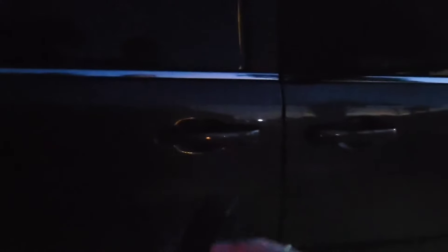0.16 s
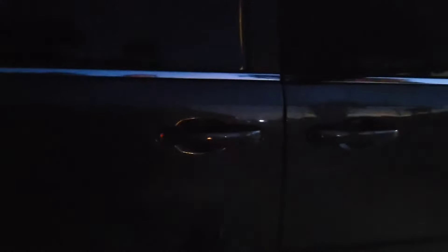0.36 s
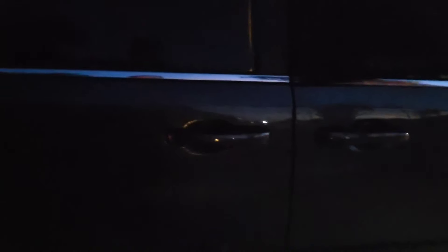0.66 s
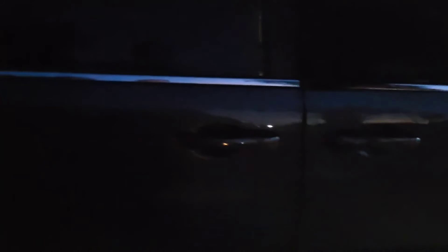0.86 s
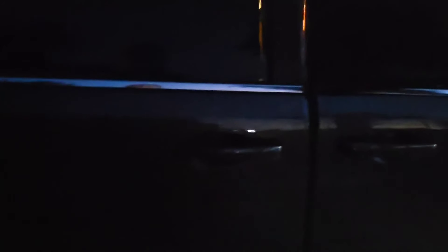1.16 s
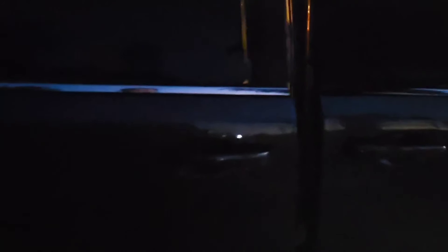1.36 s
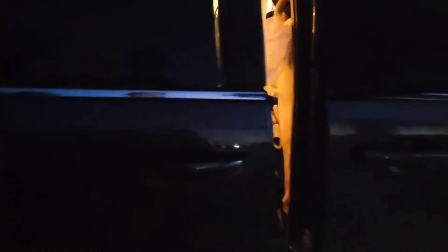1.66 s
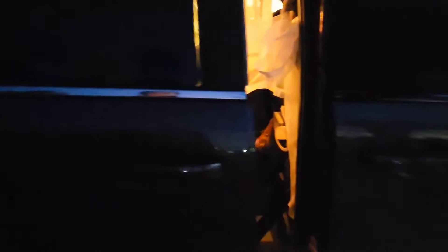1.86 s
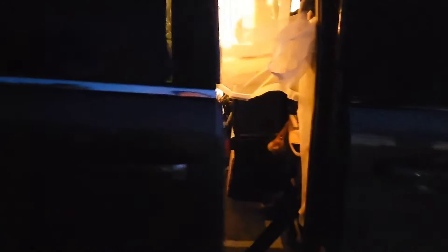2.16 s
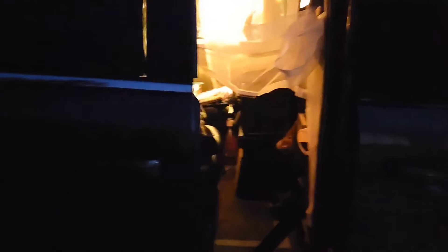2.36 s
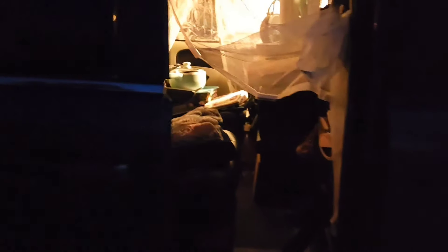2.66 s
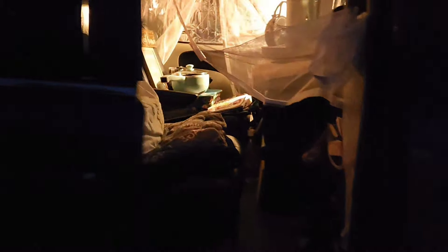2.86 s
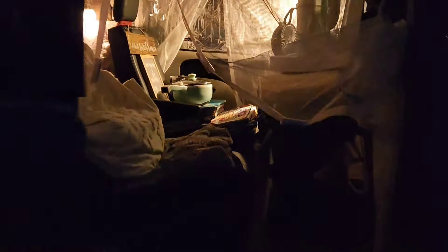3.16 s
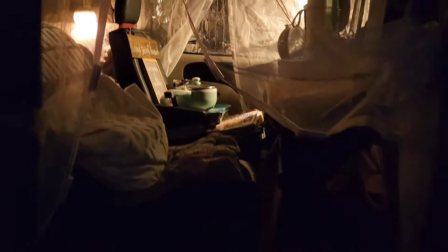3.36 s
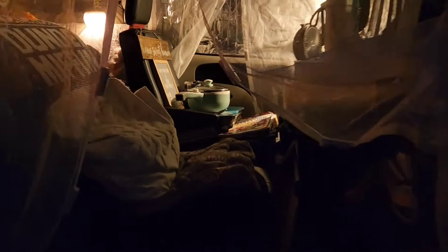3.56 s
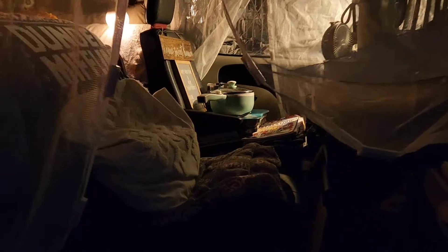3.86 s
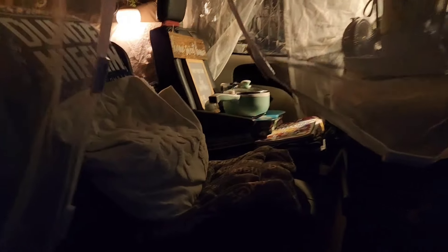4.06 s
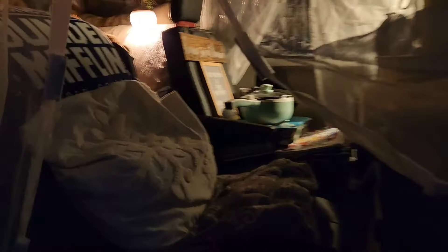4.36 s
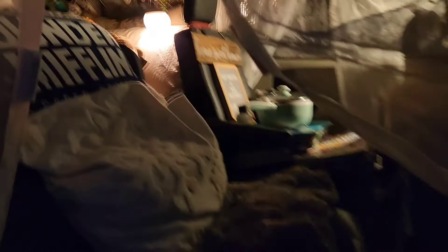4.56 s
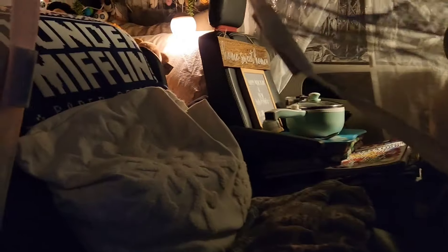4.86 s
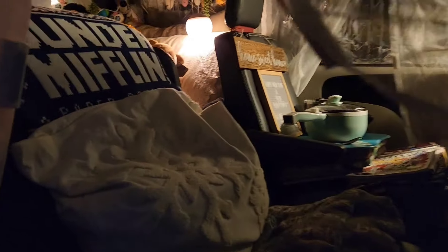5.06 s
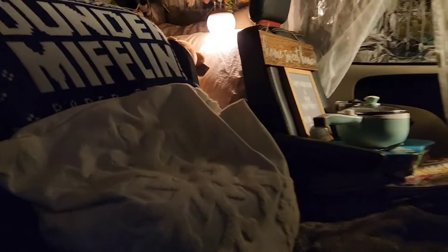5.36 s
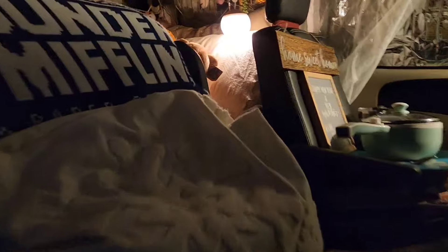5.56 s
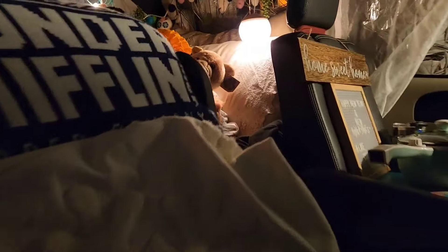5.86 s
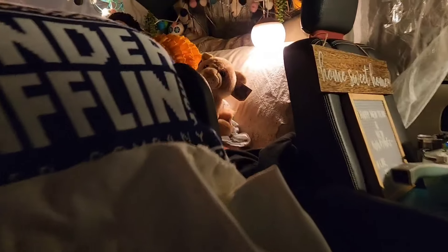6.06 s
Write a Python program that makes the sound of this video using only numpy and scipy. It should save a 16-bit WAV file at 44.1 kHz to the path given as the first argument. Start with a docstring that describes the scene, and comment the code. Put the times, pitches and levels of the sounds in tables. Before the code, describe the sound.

A low, dull street rumble opens the scene. Very near the microphone, a door latch clunks with metal clicks; after a short pause the heavy sliding door sets off, knocking and rattling, and travels for about four seconds with hollow boom, rail grind and airy roller hiss. A sharp double knock ends the travel with soft shudders. Inside the padded cabin, plastic snaps crisply at left and keys tinkle faintly at right.

```python
"""A low night street is heard first; then a van's door handle clicks and the latch lets go with a thud.
The powered sliding door rolls back along its rails, booming, grinding and hissing, and shudders on its stop.
A plastic snap follows on the left and keys on the right, while the street shifts in level and brightness.
Blows, plastic and keys are decaying modes; ticks are shaped noise bursts; door and street are drifting
noise bands; the drive is a wavering sine."""
import sys
import numpy as np
from scipy import signal
from scipy.fft import rfft, irfft
from scipy.io import wavfile

SR = 44100
rng = np.random.default_rng(int(sys.argv[2]) if len(sys.argv) > 2 else 0)


def to_wav(s):
    """Save 16-bit WAV."""
    ch = np.atleast_2d(s).T  # columns
    pcm = np.round(np.clip(ch, -1, 1) * 32767)  # PCM
    wavfile.write(sys.argv[1], SR, pcm.astype(np.int16))


N = 273443

# street at night: start_s, level_db, tilt_db [per octave]; then its spectrum: pitch_hz, density_db [per Hz, relative]
STREET_CURVE = [(0, -35.5, 2), (.6, -40, 3), (4, -41.5, 1), (5.5, -47.5, -4), (5.7, -48, 3),
                (5.95, -43, 1.7), (6.2, -51.5, 4.5)]
STREET_SPECTRUM = [(15, -36.5), (25, -8), (92, 1), (151, -21), (167, -21.5), (385, -28), (469, -36),
                   (712, -35), (1190, -41), (2210, -52), (9000, -81.5), (11700, -113), (19800, -120)]
# stereo image of the noise beds: pitch_hz, likeness [-1 to 1]; then pitch_hz, left_over_right_db
STEREO_LIKENESS = [(60, 0.99), (180, 0.98), (550, 0.61), (1650, -0.03), (4970, -0.03), (15000, 0.04)]
STEREO_LEAN = [(60, 1), (240, -0.5), (950, 1.5), (3770, -9.5), (15000, 4.5)]

# blows into the door: start_s, level_db [peak of the modes], pitch_hz [centre of the modes struck], spread_octaves
DOOR_BLOWS = [(0.218, -25.5, 513, 1.46), (.226, -21.5, 670, 2.2), (0.247, -25.5, 100, 2.5),
              (0.308, -29.5, 690, 0.19), (0.363, -19.5, 171, 1), (0.3744, -9.5, 348, 0.39),
              (0.384, -14, 202, 1.2), (0.378, -19, 1394, 0.078), (0.39, -29, 1330, 0.44),
              (0.404, -32.5, 1290, 0.81), (0.378, -15, 50, 0.38), (0.445, -29.5, 480, 1.1),
              (0.456, -39, 745, 0.75), (.464, -41, 790, 0.46), (0.757, -40, 704, 1.5),
              (0.771, -36, 1130, 0.58), (0.789, -35.5, 414, 0.15), (.794, -42, 800, .15),
              (0.909, -32.5, 356, 0.43), (.916, -40, 796, 0.4), (0.97, -28, 203, 2), (0.99, -29, 333, 0.14),
              (1.079, -46, 500, 2.3), (1.086, -43, 1160, 0.26), (1.106, -32, 1170, 0.29),
              (1.115, -37, 1200, 0.38), (1.111, -27, 337, 0.51), (1.423, -29, 796, 2.9),
              (1.491, -36, 476, 1.6), (4.796, -38.5, 696, 0.29), (5.023, -29.5, 660, 1.5),
              (5.055, -28.5, 152, 0.99), (5.175, -18, 203, 1.1), (5.1979, -17.5, 563, 0.2),
              (5.199, -15.5, 860, 0.21), (5.203, -22.5, 1210, 0.061), (5.204, -32, 2340, 0.15),
              (5.215, -17.5, 100, 1), (5.645, -38.5, 300, 1.5), (5.815, -48, 504, 1.2),
              (5.942, -46, 400, 1.1), (6.047, -43.5, 900, 1.8)]
# modes of door panel and frame: pitch_hz, level_db, t60_s
DOOR_MODES = [(48, 0, .14), (81, -2, .2), (118, -3, .18), (140, -4, .18), (166, -1, .15), (248, -3, .09),
              (290, -4, .1), (350, 0, .1), (409, -4, .11), (490, -5, .08), (603, -5, .08), (732, -7, .1),
              (790, -4, .07), (872, -1, .07), (1044, -8, .07), (1232, -2, .06), (1350, -4, .035),
              (1453, -1, .045), (1750, -12, .03), (2073, -14, .03), (2315, -10, .06)]
# a loose part rattling as the door sets off: start_s, level_db [peak of the modes]
RATTLE_BLOWS = [(1.018, -46), (1.042, -49), (1.128, -30), (1.157, -37), (1.194, -41), (1.223, -45)]
RATTLE_HZ, RATTLE_SPREAD_OCTAVES = 725, 0.076
# soft blows as the door shudders on its stop: start_s, level_db [peak of the modes]
SHUDDER_BLOWS = [(5.262, -27.5), (5.314, -26), (5.384, -29), (5.432, -28.5), (5.505, -25.5)]
SHUDDER_HZ, SHUDDER_SPREAD_OCTAVES = 210.6, 0.46
# rough contact noise under each blow; the level is relative to the blow, the band starts at its centre
SCUFF_DB, SCUFF_RISE_S, SCUFF_T60_S, SCUFF_OCTAVES = -16.5, 0.0039, 0.088, 1.2

# latch, cable and roller ticks: start_s, level_db, pitch_hz [ringing], t60_s, crack_db [broad over ring],
# tilt_db [per octave, of the broad part]
METAL_TICKS = [(0.22, -34, 3300, 0.076, 19, -5.5), (0.302, -46, 4840, .11, -7, -4),
               (0.3285, -44.5, 3320, 0.19, 14, 4), (0.349, -33, 4530, 0.042, -18, -2),
               (0.37, -31, 7200, 0.074, 17, 5.5), (0.3787, -35.5, 3520, 0.042, -3, -4.5),
               (.375, -38, 14800, .05, -2, 12), (0.401, -36, 5000, 0.056, -16, -5),
               (0.443, -47.5, 3210, 0.12, 7, -7), (0.5514, -40, 5900, 0.0082, -18, -3),
               (0.758, -40.5, 3000, 0.064, -6, -4.5), (.891, -48, 3500, 0.086, -5, -5),
               (.915, -55, 4530, 0.077, -4, 5), (0.94, -45, 6950, 0.081, -7, -1.5),
               (0.966, -46, 3760, 0.083, -6, 2), (0.9882, -38, 3520, 0.04, 2, -0.5),
               (1.08, -47, 2900, 0.043, -23, -4.5), (1.099, -44, 4340, 0.067, -24, -4),
               (1.079, -40, 6500, 0.033, -30, -7.5), (1.101, -37, 6530, 0.046, -23, -2.5),
               (1.38, -41.5, 7150, 0.11, 16, 6), (1.4276, -43, 2130, 0.064, -19, 8),
               (1.4876, -44, 2150, 0.074, -10, -2), (2.95, -46.5, 3800, 0.15, -13, -2),
               (3.001, -53, 4560, .09, -18, 3), (3.091, -35, 5400, 0.043, -10, 10.5),
               (4.047, -46, 3430, 0.04, -11, 0), (4.796, -45, 3950, 0.056, -4, 0),
               (5.0248, -18.5, 6500, 0.037, -6, 5), (5.1636, -39, 4990, 0.078, 3, -1.5),
               (5.176, -34.5, 7300, 0.042, 2.5, 8.5), (5.183, -33, 3600, 0.048, 4, -5.5),
               (5.198, -22, 4550, 0.052, -1, -3.5), (5.207, -35, 2700, 0.061, -3, -12),
               (5.29, -49, 3440, 0.26, 1, -0.5), (5.3418, -33.5, 5000, 0.038, -1, 9.5),
               (5.4558, -52.5, 5040, 0.13, -3, -1)]
# broad part of a tick: pitch_hz, density_db [per Hz, relative]
CRACK_SPECTRUM = [(120, -40), (500, 8), (1500, 9), (3000, 2.5), (8000, -2), (9500, -20), (12500, -17),
                  (15000, -17), (16500, -12.5)]
TICK_RING_WIDTH_HZ, TICK_PAN_DB = 510, -1.5
TICK_RISE_SHARE, TAIL_DB, TAIL_STRETCH = 0.06, -26.5, 3.9  # rise and tail length as multiples of t60

# bands singing as the latch is drawn and the door rolls: start_s, end_s, pitch_hz, width_hz, level_db
SINGING_BANDS = [(.268, 0.369, 353, 45, -33.5), (0.278, 0.37, 1450, 200, -45), (.24, .37, 850, 350, -47),
                 (.24, .37, 2300, 600, -56), (2.017, 2.46, 756, 162, -51), (2.096, 2.45, 7000, 70, -61),
                 (1.95, 2.453, 7600, 70, -61.5), (2.5, 3, 2240, 180, -55), (2.4, 3.5, 1430, 120, -57),
                 (2.67, 3.72, 639.6, 50.93, -52.5), (2.7, 3.61, 892, 130, -52), (3.12, 3.5, 6950, 150, -59),
                 (4.25, 4.833, 248, 47.22, -48.5), (1.95, 2.4, 1390, 90, -56), (2.05, 2.5, 5300, 150, -62),
                 (3.15, 3.6, 1900, 90, -62)]
# the drive whines late in the travel, strains before the stop, drops out at the blow and runs on briefly
WHINE_HZ, WHINE_DB, STRAIN_DB = 8000, -75, 8  # strain is a lift above the whine level
WHINE_FROM_S, STRAIN_S, DROP_S, RESUME_S, WHINE_TO_S = 3.7, 5.06, 5.152, 5.2, 5.285

# door on its rails: start_s, grind_db, hiss_db
SLIDE_CURVE = [(.7, -53, -68), (.91, -45, -65), (1.11, -41, -56), (1.75, -48, -54.5), (2.42, -43, -49),
               (3.28, -43, -46), (4.3, -45, -53), (5.02, -45.5, -54), (5.2, -41, -62.5),
               (5.451, -48, -65.5), (5.799, -59, -60.5)]
# rail grinding, then roller hiss: pitch_hz, density_db [per Hz, relative]
GRIND_SPECTRUM = [(82, -21.5), (140, -3), (210, -5), (467, -20.5), (631, -18.5), (1560, -28.5), (2190, -48),
                  (3200, -47.5), (4160, -72.5), (7040, -120)]
HISS_SPECTRUM = [(880, -41.5), (1500, -13.5), (1760, 7.5), (2210, 12.5), (3350, -12), (5940, -5),
                 (7030, -3), (9100, -20), (15100, -24), (16000, -25.5)]
HISS_TILT_DB, TILT_PER_HISS_DB = 10, 0.5612  # per octave at the loudest; softer hiss is duller
# booming panel: pitch_hz, width_hz, loudest_s, level_db [at loudest_s], fall_db [one second away], jolt_db
PANEL_BOOMS = [(51.8, 7.4, 2.05, -46.5, 2.5, -32.5), (87.4, 10.4, 3.91, -35.5, 7.5, -32),
               (123.4, 16.7, 2.7, -39, 4, -34)]
JOLT_S, JOLT_RISE_S, JOLT_T60_S = 0.924, 0.02, 1  # the door setting off
GRIT_PER_S, GRIT_DB, GRIT_S = 45, 2., .005  # grit under the rollers: rate, mean lift, fall time
ROLLER_WIDTH_SHARE, ROLLER_WANDER_SHARE, ROLLER_SWELL_DB = .035, .015, 3.5  # shares of the pitch

# plastic snap and its bounces: start_s, level_db [peak]
SNAP_HITS = [(5.6454, -4.5), (5.6508, -15.5), (5.6605, -32.5), (5.6697, -24.5)]
# modes of the plastic part: pitch_hz, level_db, t60_s
PLASTIC_MODES = [(627, -16, 0.012), (1090, -8.5, 0.0083), (1440, -8, 0.012), (2124, -6, 0.02),
                 (2652, -5, 0.022), (3180, -0.5, 0.0069), (3880, -13, 0.0054), (4920, -8, 0.007),
                 (5290, -24.5, .006), (6260, -26.5, 0.0065), (7300, -26, .006), (8200, -29, 0.005)]
SNAP_PAN_DB, SNAP_LEAD_S = 7, .00042  # louder and earlier on the left
CABIN_DB, CABIN_TREBLE_DB = -19, -36  # cabin answer relative to each hit

# keys touching: start_s, ring_db [peak, before chatter], crack_db [before chatter]
KEY_TOUCHES = [(6.035, -58, -47), (6.0455, -41, -28.5), (6.051, -40, -28.5), (6.06, -22, -40),
               (6.115, -43, -35), (6.166, -67, -54)]
# modes of the keys: pitch_hz, level_db, t60_s
KEY_MODES = [(5150, -12, .03), (5663, -15, .045), (6440, -11, .045), (7520, -13, .03), (8760, -11, .03),
             (9044, -13, .04), (10380, -18, .055), (12200, -16, .03), (13125, -6, .045), (15030, 2, .055),
             (15450, -12, .04)]
KEYS_PAN_DB, KEYS_LEAD_S = -13.5, -0.00027  # louder and earlier on the right
CHATTER_DB, CHATTER_HZ = 2.5, 250  # keys lying against each other ring unevenly

TOP_CUT_HZ = 17000
SIDES = np.array([[1], [-1]])  # left, right


def from_db(db):
    """Gain of a level in dB."""
    return 10 ** (np.asarray(db) / 20)


def rms_one(x):
    """Sound scaled to rms 1."""
    return x / np.sqrt(np.mean(np.abs(x) ** 2) + 1e-20)


def in_time(rows):
    """Columns of a breakpoint curve, read at every sample."""
    s, *columns = np.transpose(rows)
    return [np.interp(np.arange(N) / SR, s, column) for column in columns]


def at_hz(points, hz):
    """A spectrum read on a log frequency axis."""
    point_hz, values = np.transpose(points)
    return np.interp(np.log(hz), np.log(point_hz), values)


def span(start, end, edge_s):
    """Gain 1 between two times, with soft edges."""
    corners = [start - edge_s, start + edge_s, end - edge_s, end + edge_s]
    return np.interp(np.arange(N) / SR, corners, [0, 1, 1, 0])


def rise(t, rise_s):
    """Smooth attack from 0 towards 1 while a contact builds up."""
    return 1 - np.exp(-(t / rise_s) ** 2)


def drift(rate_hz):
    """Slow chance: noise at every 20th sample through a double one-pole low-pass, rms 1."""
    r = np.exp(-40 * np.pi * rate_hz / SR)
    noise = rng.standard_normal(N // 20 + 3002)
    slow = signal.lfilter([1], [1, -2 * r, r * r], noise)[3000:]  # skip the filter's start
    return np.interp(np.arange(N) / 20, np.arange(len(slow)), rms_one(slow))


def widen(mid, side, alike):
    """Stereo from two independent noises: alike is the likeness of left and right."""
    return np.sqrt(1 + alike) * mid + np.sqrt(1 - alike) * side * SIDES


def banded(spectrum, patchy_db, tilt_db, pivot_hz):
    """Third-octave bands of stereo noise, each with its own level, flicker, likeness and lean."""
    out, power, together = 0, 0, drift(5.2)
    edges = 22 * 2 ** (np.arange(30) / 3)
    white = rng.standard_normal((2, 2, N))  # neighbouring bands use different noise
    for k, (low, high) in enumerate(zip(edges, edges[1:])):
        hz = np.sqrt(low * high)
        if not spectrum[0][0] * .8 < hz < spectrum[-1][0] * 1.1:
            continue
        band_filter = signal.butter(2, [low, high], "band", fs=SR, output="sos")
        mid, side = signal.sosfilt(band_filter, white[k % 2])
        alike = np.clip(at_hz(STEREO_LIKENESS, hz), -1, 1)
        lean = from_db(at_hz(STEREO_LEAN, hz) / 2 * SIDES)
        band = from_db(at_hz(spectrum, hz)) * lean * widen(mid, side, alike)
        power += np.mean(band ** 2)
        flicker_db = patchy_db * (.4 * together + drift(12))
        out = out + band * from_db(tilt_db * np.log2(hz / pivot_hz) + flicker_db)
    return out / np.sqrt(power)


def narrow(hz, width_hz, alike, wander=0.):
    """Narrow stereo noise: a carrier, which may wander in pitch, under two slow random amplitudes."""
    turn = 2 * np.pi * hz * np.cumsum(1 + wander * drift(.8)) / SR
    cos, sin = np.cos(turn), np.sin(turn)
    mid, side = [drift(width_hz) * cos + drift(width_hz) * sin for _ in range(2)]
    return rms_one(widen(mid, side, alike))


def burst(size, low_hz, high_hz, t60):
    """Band of noise that dies away, unrelated on the two sides."""
    band = signal.butter(2, [low_hz, high_hz], "band", fs=SR, output="sos")
    noise = rms_one(signal.sosfilt(band, rng.standard_normal((2, size))))
    return noise * from_db(-60 * np.arange(size) / SR / t60)


def struck(modes, gains_db, phases, rise_s, length_s):
    """Modes ringing out after one blow, building up while the contact lasts; peak 1."""
    hz, level_db, t60 = np.transpose(modes)[:, :, None]
    t = np.arange(int(length_s * SR)) / SR
    decay = from_db(level_db + gains_db[:, None] - 60 * t / t60)
    rings = decay * np.sin(2 * np.pi * hz * t + phases[..., None])
    ring = rings.sum(axis=-2) * rise(t, rise_s)
    return ring / np.abs(ring).max()


def add(out, s, sound, pan_db=0., lead_s=0.):
    """Places a sound at time s; positive pan and lead make the left louder and earlier."""
    sound = sound * np.ones((2, 1))
    for ch, sign in enumerate((1, -1)):
        at = round((s - sign * lead_s / 2) * SR)
        out[ch, at:at + sound.shape[1]] += from_db(sign * pan_db / 2) * sound[ch, :N - at]


def street():
    """The street at night: banded noise whose level and spectral tilt follow a curve."""
    level_db, tilt_db = in_time(STREET_CURVE)
    return from_db(level_db) * banded(STREET_SPECTRUM, patchy_db=1.5, tilt_db=tilt_db, pivot_hz=81.8)


def door_knocks():
    """Blows ring door modes around their centre, low-centred ones with longer contact, plus a scuff."""
    out, pitches, count = np.zeros((2, N)), np.array(DOOR_MODES)[:, 0], len(DOOR_MODES)
    rattle = [(s, peak_db, RATTLE_HZ, RATTLE_SPREAD_OCTAVES) for s, peak_db in RATTLE_BLOWS]
    shudder = [(s, peak_db, SHUDDER_HZ, SHUDDER_SPREAD_OCTAVES) for s, peak_db in SHUDDER_BLOWS]
    scuff_rise = rise(np.arange(6000) / SR, SCUFF_RISE_S)
    for s, peak_db, hz, spread in DOOR_BLOWS + rattle + shudder:
        reach_db = -6 * (np.log2(pitches / hz) / spread) ** 2 + rng.normal(0, 0.18, count)
        # neighbouring modes start in opposite sense; the sides differ more in phase at high modes
        apart = rng.normal(0, 1, count) * pitches / 1500
        phases = np.pi * np.arange(count) + rng.normal(0, .7, count) + np.outer([.5, -.5], apart)
        ring = struck(DOOR_MODES, reach_db, phases, rise_s=0.53 / hz, length_s=0.24)
        add(out, s, from_db(peak_db) * ring)
        scuff = burst(6000, hz, hz * 2 ** SCUFF_OCTAVES, SCUFF_T60_S) * scuff_rise
        shared_scuff = scuff + scuff[::-1] * at_hz(STEREO_LIKENESS, hz)
        add(out, s, from_db(peak_db + SCUFF_DB) * shared_scuff)
    return out


def ticks():
    """Metal parts meet: a burst of noise, part broad, part ringing, with a faint tail in the bodywork."""
    out, size = np.zeros((2, N)), 8192
    t, f = np.arange(size) / SR, np.fft.rfftfreq(size, 1 / SR) + 1
    for s, level_db, hz, t60, crack_db, tilt_db in METAL_TICKS:
        broad = from_db(crack_db + at_hz(CRACK_SPECTRUM, f) + tilt_db * np.log2(f / 5000))
        ringing = 1 / (1 + ((f - hz) / TICK_RING_WIDTH_HZ * 2) ** 2)
        spectrum = rfft(rng.standard_normal((2, size))) * (broad + ringing)
        noise = rms_one(irfft(spectrum, size))
        rise_s = TICK_RISE_SHARE * t60
        decay = from_db(-60 * t / t60) + from_db(TAIL_DB - 60 * t / (TAIL_STRETCH * t60))
        shape = rise(t, rise_s) * decay
        add(out, s - rise_s / 2, from_db(level_db) * noise * shape / shape.max(), TICK_PAN_DB)
    return out


def singing():
    """Narrow bands of noise that swell, fade and wander slightly in pitch."""
    out, t = 0, np.arange(N) / SR
    for start, end, hz, width_hz, level_db in SINGING_BANDS:
        swell = np.sin(np.pi * np.clip((t - start) / (end - start), 0, 1)) ** .7
        alike = np.clip(at_hz(STEREO_LIKENESS, hz), 0, 1)
        out = out + from_db(level_db) * swell * narrow(hz, width_hz, alike, wander=.006)
    return out


def boom():
    """Each panel mode swells towards its place on the rail and jumps up as the door sets off."""
    out, t = 0, np.arange(N) / SR
    since = np.clip(t - JOLT_S, 0, None)
    jolt = (1 - np.exp(-since / JOLT_RISE_S)) * from_db(-60 * since / JOLT_T60_S)
    for hz, width_hz, loudest_s, level_db, fall_db, jolt_db in PANEL_BOOMS:
        swell = from_db(level_db - fall_db * (t - loudest_s) ** 2)
        out = out + (swell + from_db(jolt_db) * jolt) * narrow(hz, width_hz, .99)
    return out


def rollers(count):
    """Resonances of rollers and rail, each swelling and drifting in pitch at random."""
    out = 0
    for hz in np.geomspace(2600, 7900, count):
        swell = from_db(ROLLER_SWELL_DB * drift(1.5))
        out = out + swell * narrow(hz, ROLLER_WIDTH_SHARE * hz, 0, ROLLER_WANDER_SHARE)
    return rms_one(out)


def grit():
    """Gain that jumps up at random moments and quickly falls back."""
    hits = rng.random(N) < GRIT_PER_S / SR
    jumps_db = hits * np.minimum(rng.exponential(GRIT_DB, N), 3 * GRIT_DB)
    return from_db(signal.lfilter([1], [1, -np.exp(-1 / (GRIT_S * SR))], jumps_db))


def rolling():
    """The panel booms, the rails grind and the rollers hiss while the door travels."""
    grind_db, hiss_db = in_time(SLIDE_CURVE)
    tilt_db = HISS_TILT_DB + TILT_PER_HISS_DB * (hiss_db - hiss_db.max())
    moving = span(SLIDE_CURVE[0][0] - .05, SLIDE_CURVE[-1][0] - .05, .05)
    grind = from_db(grind_db) * banded(GRIND_SPECTRUM, patchy_db=3.0, tilt_db=0, pivot_hz=500)
    rush = banded(HISS_SPECTRUM, patchy_db=.8, tilt_db=tilt_db, pivot_hz=6000)
    hiss = from_db(hiss_db) * grit() * (rush + from_db(-6) * rollers(count=12))
    return moving * (boom() + grind + hiss)


def drive_whine():
    """A sine wavering in pitch, flickering separately on each side, louder under strain."""
    t = np.arange(N) / SR
    on = span(WHINE_FROM_S, DROP_S, .01) + span(RESUME_S, WHINE_TO_S, .01)
    level_db = WHINE_DB + STRAIN_DB * span(STRAIN_S, WHINE_TO_S + .1, .04)
    flicker_db = 4 * np.array([drift(7), drift(7)])
    waver = np.cumsum(10 * drift(15)) / SR  # 10 Hz rms
    return on * from_db(level_db + flicker_db) * np.sin(2 * np.pi * (WHINE_HZ * t + waver))


def snap():
    """A stiff plastic part lets go and bounces, ringing its modes; the padded cabin answers briefly."""
    out, count = np.zeros((2, N)), len(PLASTIC_MODES)
    phases = np.pi * np.arange(count)  # neighbouring modes start in opposite sense
    for s, peak_db in SNAP_HITS:
        ring = struck(PLASTIC_MODES, rng.normal(0, 2, count), phases, rise_s=.0003, length_s=.04)
        cabin = burst(size=4000, low_hz=1500, high_hz=5500, t60=.045)
        cabin_treble = burst(size=4000, low_hz=5500, high_hz=8500, t60=0.021)
        add(out, s, from_db(peak_db) * ring, SNAP_PAN_DB, SNAP_LEAD_S)
        add(out, s, from_db(peak_db + CABIN_DB) * cabin, SNAP_PAN_DB / 2)
        add(out, s, from_db(peak_db + CABIN_TREBLE_DB) * cabin_treble, SNAP_PAN_DB / 2)
    return out


def keys():
    """Each touch cracks briefly, rustles on and rings the keys' modes with new strengths."""
    out, count = np.zeros((2, N)), len(KEY_MODES)
    crack_rise = rise(np.arange(3000) / SR, np.inf) + 1 - np.exp(-np.arange(3000) / SR / 0.00094)
    for s, ring_db, crack_db in KEY_TOUCHES:
        strengths_db, phases = rng.normal(0, 2, count), rng.uniform(0, 2 * np.pi, count)
        ring = struck(KEY_MODES, strengths_db, phases, rise_s=0.002, length_s=.2)
        crack = burst(size=3000, low_hz=2500, high_hz=9500, t60=.012)
        rustle = from_db(-6) * burst(size=3000, low_hz=1500, high_hz=9000, t60=.075)
        add(out, s, from_db(ring_db) * ring, KEYS_PAN_DB, KEYS_LEAD_S)
        add(out, s, from_db(crack_db) * (crack + rustle) * crack_rise, KEYS_PAN_DB * 0.51)
    return out * from_db(CHATTER_DB * drift(CHATTER_HZ))


def scene():
    """The street, the door with its latch and drive, then the small things inside."""
    door = door_knocks() + ticks() + singing() + rolling() + drive_whine()
    return street() + door + snap() + keys()


def record(dry):
    """A steep low-pass removes the top."""
    return signal.sosfilt(signal.cheby2(14, 90, TOP_CUT_HZ, fs=SR, output="sos"), dry)


dry = scene()
out = record(dry)
to_wav(out)
```